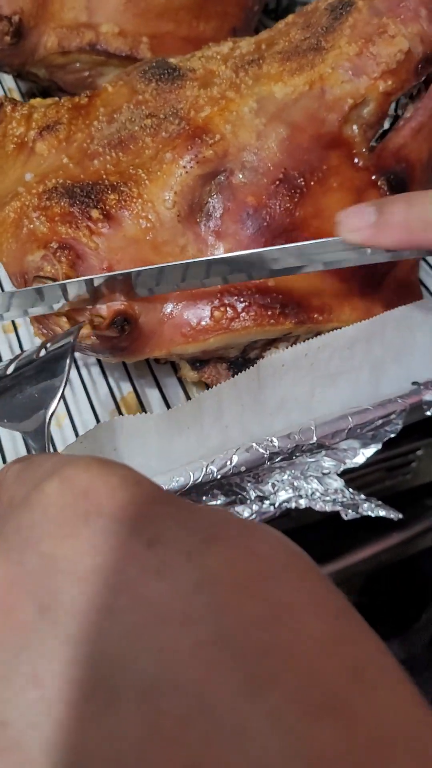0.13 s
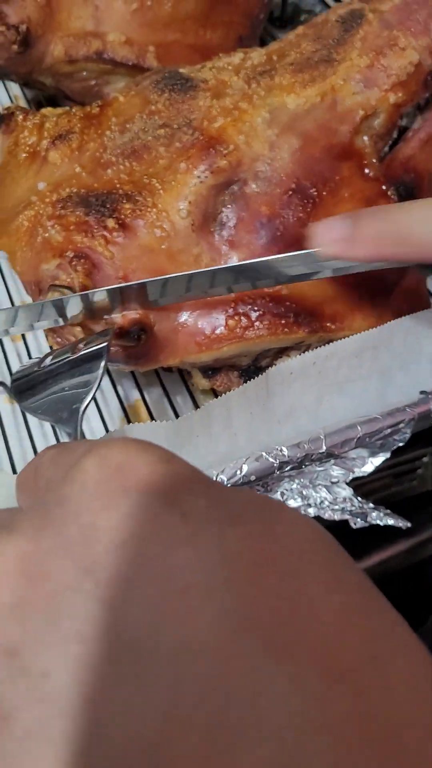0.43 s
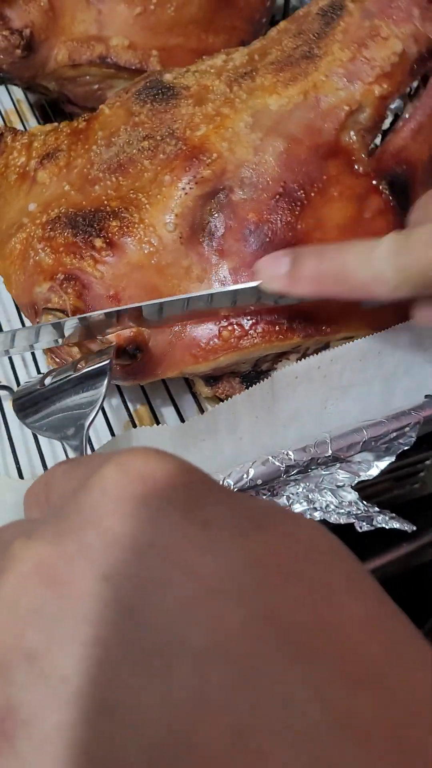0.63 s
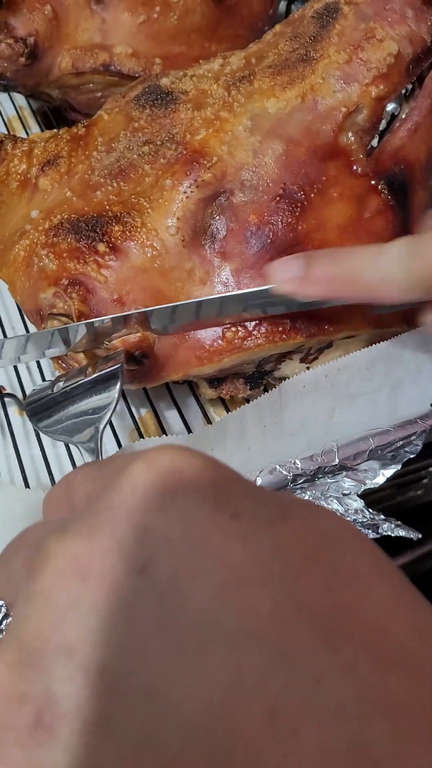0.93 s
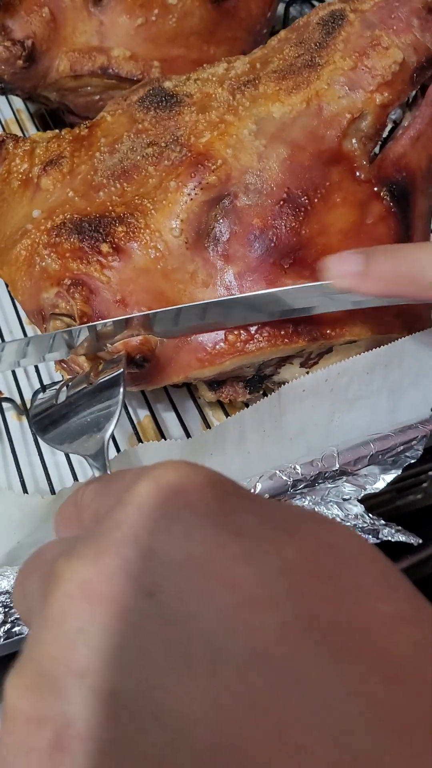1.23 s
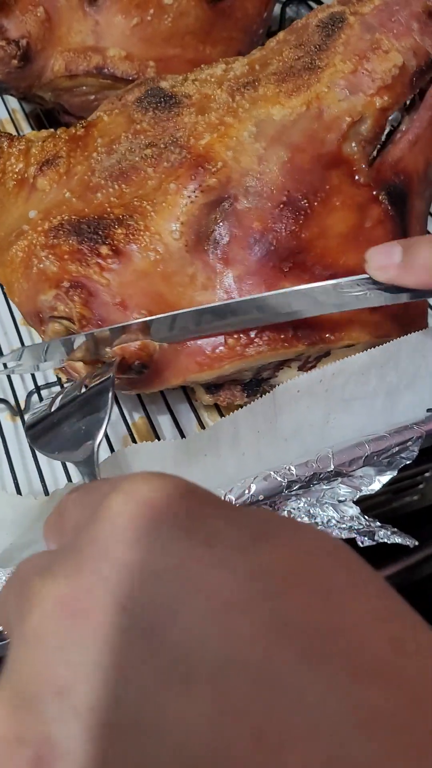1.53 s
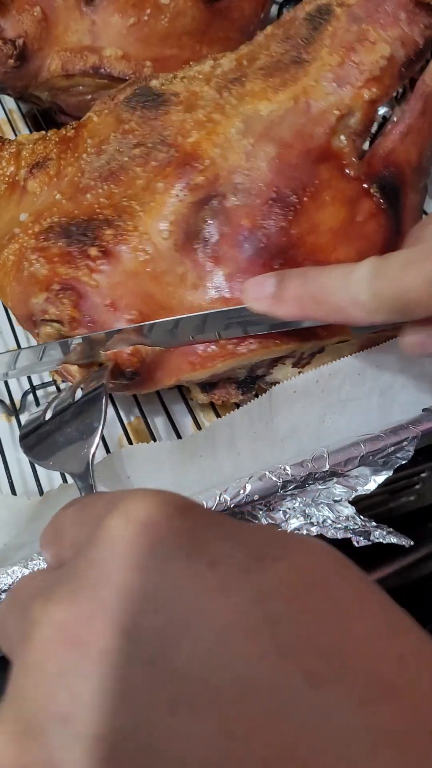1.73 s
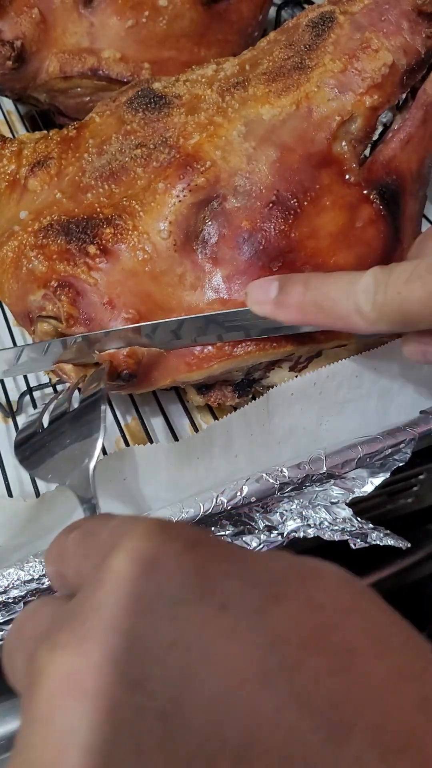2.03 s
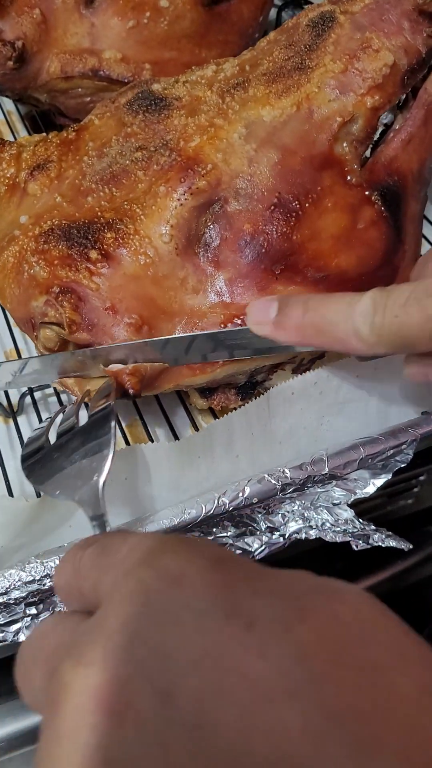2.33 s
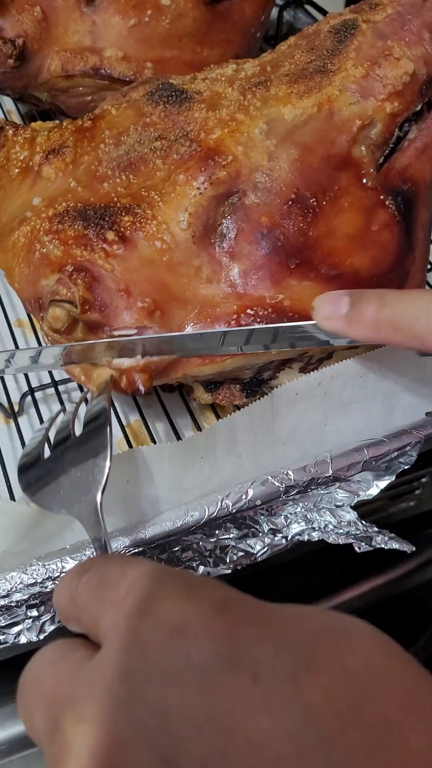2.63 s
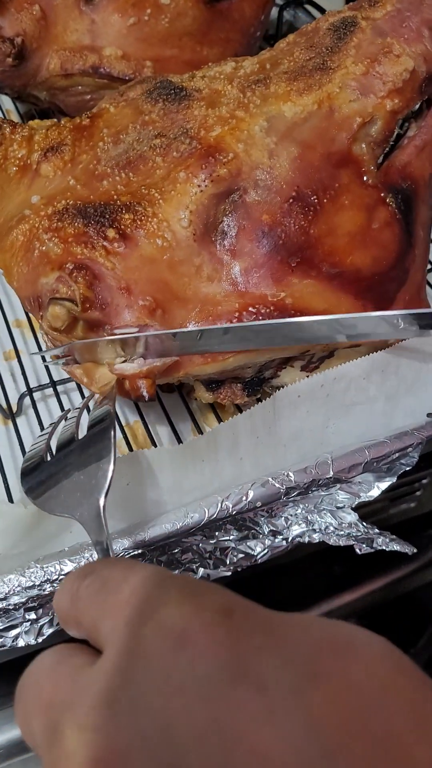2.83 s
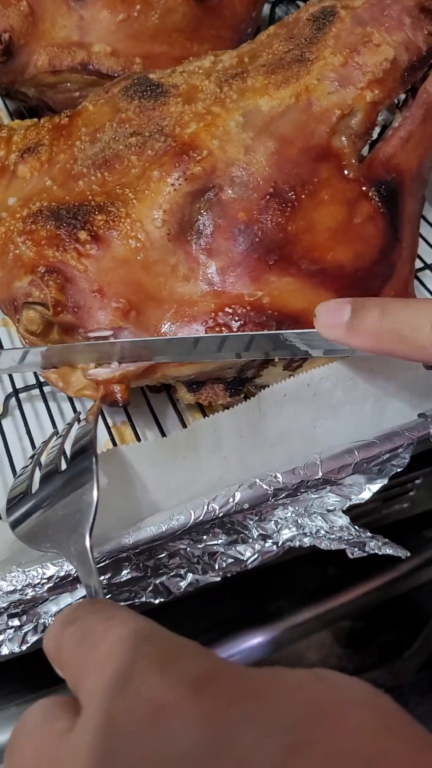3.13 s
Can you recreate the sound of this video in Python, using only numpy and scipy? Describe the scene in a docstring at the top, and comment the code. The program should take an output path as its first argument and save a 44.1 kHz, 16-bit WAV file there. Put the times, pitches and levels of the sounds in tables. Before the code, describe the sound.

Close up in a kitchen, rapid to-and-fro sawing crunches through brittle roast crust, with dry snaps and dull knocks, strongest mid-way and softer near the end, over faint room hum and handling rumble.

```python
"""Crackle and low thuds over a faint hum: a serrated knife saws to and fro through crisp roasted skin,
close to a phone in a kitchen. The teeth stick and slip: they judder the roast and its rack (thuds),
crush the crust (dense crackle), snap blisters (sharp cracks) and now and then catch hard (jolts).
Random clicks and noise set off these rings and rustles. The moving phone rumbles, an appliance hums
over the room noise, and the kitchen adds a short echo."""
import sys
import numpy as np
from scipy import signal
from scipy.fft import rfft, irfft
from scipy.io import wavfile
from scipy.ndimage import uniform_filter1d, map_coordinates

SR = 44100
rng = np.random.default_rng(int(sys.argv[2]) if len(sys.argv) > 2 else 0)


def waveform_to_disk(signal):
    """Save audio, clipped to [-1, 1], as 16-bit WAV at the path in sys.argv[1]."""
    frames = np.transpose(np.atleast_2d(signal))
    scaled = np.clip(frames, -1, 1) * 32767
    samples = np.round(scaled).astype(np.int16)
    wavfile.write(sys.argv[1], SR, samples)


N = 145530

# Loudness of the sawing, one list per knife stroke:
# time_s, judder_db (roast), knock_db (crust), crunch_db, fizz_db (fine crackle)
STROKE_LEVELS = [
    [(0.0, -53.5, -48, -59, -56), (0.046, -58.5, -91, -74, -59), (0.05, -71, -54.5, -73, -64),
     (0.062, -73, -69, -75, -66), (0.072, -51, -54.5, -82, -60), (0.08, -64, -79, -75, -59)],
    [(0.08, -69, -66, -78, -65), (0.106, -55, -55.5, -63.5, -65), (0.164, -50, -55, -66, -68),
     (0.174, -54, -68, -67, -65), (0.178, -58, -54, -68, -69), (0.21, -69, -78, -85, -77)],
    [(0.21, -74, -71, -95, -80), (0.228, -55, -56, -82, -65), (0.288, -49.5, -45, -49.5, -54),
     (0.324, -51.5, -48, -56, -54), (0.352, -44.5, -55, -56, -57), (0.41, -76, -67, -98, -74)],
    [(0.41, -78, -67, -68, -64), (0.432, -52, -48, -66, -60), (0.464, -39.5, -48, -56, -65),
     (0.494, -51, -43.5, -59, -63), (0.514, -51, -69, -72, -65), (0.56, -66, -55, -73, -69)],
    [(0.56, -66, -76, -76, -70), (0.59, -44.5, -43.5, -47.5, -51), (0.664, -42.5, -51.5, -49.5, -46),
     (0.688, -58, -55, -68, -65), (0.694, -40.5, -55, -68, -66), (0.74, -65, -78, -69, -76)],
    [(0.74, -52, -58, -61, -58), (0.764, -62, -66, -63, -69), (0.776, -35, -41, -57, -54),
     (0.788, -54.5, -55, -57, -55), (0.804, -39.5, -47.5, -53, -59), (0.91, -64.5, -66, -93, -78)],
    [(0.91, -53, -72, -70, -62), (0.94, -55, -46, -59, -57), (0.976, -41.5, -56, -55, -54),
     (0.996, -43.5, -58, -56, -59), (1.052, -65, -79, -79, -76), (1.08, -75, -72, -74, -81)],
    [(1.08, -65, -66, -66, -66), (1.092, -58, -64, -68, -69), (1.1, -54, -57, -61, -64),
     (1.15, -40.5, -41.5, -53, -59), (1.176, -46, -50.5, -55, -66), (1.24, -67, -67, -103, -83)],
    [(1.24, -65, -68, -70, -56), (1.244, -69, -71, -73, -74), (1.262, -38.5, -43.5, -55.5, -53),
     (1.33, -40.5, -44.5, -52, -50.5), (1.388, -53.5, -66, -70, -79), (1.42, -72, -55.5, -67, -61)],
    [(1.42, -58, -66, -63, -57), (1.45, -49.5, -53.5, -57.5, -59), (1.468, -41, -37.5, -49, -55),
     (1.504, -34.5, -38.5, -47, -59), (1.582, -55, -67, -75, -71), (1.6, -46, -46, -57, -57)],
    [(1.6, -69, -58, -70, -61), (1.614, -65, -53.5, -54.5, -55), (1.63, -26.5, -30, -48, -50),
     (1.644, -44, -45, -44, -48), (1.68, -37.5, -37, -54, -40.5), (1.77, -57.5, -70, -70, -69)],
    [(1.77, -54, -74, -62, -71), (1.794, -54, -48.5, -51, -55), (1.826, -42.5, -44, -42, -37.5),
     (1.87, -45.5, -50, -47, -45), (1.914, -63, -79, -75, -79), (1.92, -66, -60, -70, -74)],
    [(1.92, -68, -57, -67, -75), (1.93, -67, -57, -56, -61), (1.944, -51.5, -49.5, -47, -45),
     (1.968, -44, -43.5, -42.5, -43), (2.01, -40.5, -39.5, -44, -43), (2.1, -67, -68, -63, -60)],
    [(2.1, -56, -57, -63, -66), (2.128, -47, -48.5, -52, -46), (2.186, -51, -47.5, -51.5, -60),
     (2.246, -56, -66, -71, -59), (2.26, -62, -54, -71, -72)],
    [(2.26, -57, -53, -55.5, -59), (2.296, -46.5, -42, -50, -52), (2.344, -44, -51, -48, -48),
     (2.36, -48, -46, -64, -50), (2.39, -57.5, -63, -76, -65), (2.43, -57, -61.5, -65, -74)],
    [(2.43, -58, -59, -66, -75), (2.456, -44.5, -54, -57, -42), (2.49, -45, -46, -45, -37),
     (2.632, -62, -57.5, -63, -60), (2.65, -61, -60, -66, -58.5), (2.72, -64, -68, -70, -74)],
    [(2.72, -80, -60, -71, -64), (2.742, -57, -56, -65.5, -65), (2.78, -52, -54, -56.5, -66),
     (2.826, -55.5, -65.5, -72.5, -70), (2.894, -65, -66, -74, -72), (2.94, -68, -86, -99, -77)],
    [(2.94, -68, -78, -96.5, -80), (2.968, -61, -66, -81.5, -77), (2.976, -58, -60.5, -74, -64),
     (3.062, -56, -47.5, -53, -49), (3.118, -55.5, -53.5, -54.5, -59), (3.19, -62, -66, -94, -89)],
    [(3.19, -72, -78, -82, -75), (3.196, -71, -74, -65, -81), (3.206, -64, -51, -60, -54),
     (3.262, -48.5, -48.5, -46, -49), (3.28, -44, -48, -69, -71), (3.3, -47, -46, -51, -69)],
]
# Snapping blisters: start_s, level_db, and three gains within the snap:
# mid_db (900-2300 Hz), top_db (9500-19000 Hz), tail_db (splintering)
BLISTER_CRACKS = [(0.0074, -41, -9, 10, -19), (0.0278, -36.5, -10, -11, -19), (0.0488, -56, 1, 4, -8),
                  (0.0734, -48.5, 5, 4, -10), (0.223, -46.5, -5, -3, -5.5), (0.2326, -50.5, 1, 10, -16),
                  (0.257, -42, 1, -4, -5), (0.2815, -47, 2, 4, -5), (0.295, -40, -5, -1.5, -3.5),
                  (0.344, -38.5, -11, -4, -9.5), (0.4696, -61, -4, -9, -12), (0.5683, -53.5, 12, 14.5, -5),
                  (0.6014, -22, -14, 1, -13), (0.6155, -39, 5, 5, -15), (0.628, -36.5, -2, -3, -5.5),
                  (0.656, -25, -7, -0.5, -16.5), (0.67, -34, -18, 0, -9), (0.7535, -43.5, -6, 16.5, -16),
                  (0.7632, -41, -16, 2, -12), (0.8011, -40.5, 1, -19, -2.5), (0.828, -33.5, -0.5, -28, -14),
                  (0.9418, -42.5, -3, -12, -7), (0.962, -36, 0, 3, -20), (0.99, -42.5, -14, -8, -7),
                  (1.101, -46, -1, -9, -11), (1.1258, -39, 0, -9, -9), (1.1472, -35.5, -3, -12, -11.5),
                  (1.267, -42, -9, 9, -17), (1.275, -29.5, -19, -6, -17), (1.3032, -39, 0, -11, -4),
                  (1.3203, -43, -8, -7, -7), (1.418, -37, -10, -1.5, -14), (1.477, -43, -2, -12, -10),
                  (1.4895, -34, -1, -13, -13), (1.624, -34, -2, -3, -4), (1.645, -22.5, -15, 6, -10.5),
                  (1.6713, -24, -4, -26, -6.5), (1.6934, -30, -12, 9, -11.5), (1.7004, -22.5, -5, -12, -17),
                  (1.7978, -36, -21, -3, -2), (1.8159, -31, -17, -17, -5), (1.8589, -30.5, -5, -21, -1.5),
                  (1.9417, -32, 0, 0, -8.5), (1.9638, -33, 3, -4, -7.5), (1.9872, -24.5, -4, -22, -19),
                  (2.0148, -29.5, -17, -11, -9), (2.062, -36.5, 0, 9, -7), (2.1272, -35.5, -6, 6.5, -6.5),
                  (2.151, -33.5, -5, 10, -2), (2.1742, -33.5, 1, 17.5, -14), (2.1901, -26.5, -12, 0, -9),
                  (2.326, -32, -16, 1, -8.5), (2.3868, -40.5, -18, 4, -8), (2.4516, -37.5, -1, 8.5, -3.5),
                  (2.4663, -28.5, 5.5, -2, -10), (2.4783, -36, 1, -3, -5), (2.4817, -19, -8.5, -1, -2.5),
                  (2.4987, -21, -12, -2, -12), (2.52, -18.5, 0.5, -5, -7.5), (2.55, -22.5, -13, -1, -4.5),
                  (2.5991, -37, -5, 1, -9), (2.635, -47, 1, 1, -3), (2.7581, -58, 17.5, 0, -1),
                  (2.8062, -59, 13, 10, -7), (3.0024, -54, 1, 4, 1), (3.03, -41, 7, 2, -10),
                  (3.052, -27.5, 6, 3.5, -8), (3.0631, -40.5, 13.5, -32, 1.5), (3.207, -48, 16, -3, -12),
                  (3.226, -30, -3, 1, -9), (3.2626, -35, -8, -2, 0), (3.2768, -13.5, -13, -0.5, -3)]
# Teeth that catch hard and jolt the roast:
# start_s, level_db, pitch_hz, knock_db (crust balance, added to level_db)
HARD_CATCHES = [(0.105, -45, 283, -6), (0.133, -46, 316, -11), (0.24, -37, 990, -20),
                (0.261, -47, 274, -12), (0.286, -42.5, 231, -12), (0.304, -51, 229, 2),
                (0.327, -44, 920, -2), (0.35, -47, 250, 4), (0.361, -56, 296, -9), (0.443, -55, 230, 17),
                (0.467, -36.5, 330, 6), (0.488, -36, 286, 3.5), (0.589, -37, 268, -2),
                (0.609, -42, 270, 11), (0.636, -42, 264, -11), (0.653, -38, 640, 1), (0.694, -43.5, 298, 9),
                (0.773, -59, 255, 9), (0.786, -45, 340, -18), (0.803, -34.5, 326, 8),
                (0.824, -37.5, 332, 4), (0.934, -48, 328, 6), (0.942, -34, 320, 3), (0.965, -33, 324, 4.5),
                (0.988, -33, 328, 5.5), (1.105, -43.5, 254, -10), (1.155, -32, 250, -16),
                (1.179, -38, 249, 6.5), (1.258, -35, 257, 2.5), (1.276, -35, 318, -20),
                (1.285, -34.5, 370, -3), (1.305, -34, 230, -5), (1.328, -35.5, 246, -3),
                (1.467, -36, 258, 12), (1.48, -39, 260, -13), (1.498, -26, 269, -1), (1.523, -34.5, 223, 0),
                (1.541, -36.5, 240, -2), (1.627, -28, 333, -8), (1.656, -36.5, 206, 12),
                (1.669, -31.5, 957, 8.5), (1.691, -32, 316, 0), (1.733, -44.5, 240, -16),
                (1.832, -35, 260, -12), (1.858, -34.5, 270, -5), (1.877, -46, 230, -15),
                (1.952, -40, 890, -4), (1.971, -36.5, 330, 9), (1.986, -42, 181, -4),
                (2.008, -38.5, 328, -9), (2.131, -40, 328, 2), (2.16, -38, 185, -8), (2.187, -43, 328, -2),
                (2.299, -51, 335, 4), (2.322, -38.5, 274, 7), (2.336, -39, 263, -12), (2.347, -45, 314, -4),
                (2.459, -49, 316, 3), (2.482, -37.5, 663, 3), (2.544, -41, 1110, -3), (2.767, -43, 316, -3),
                (2.78, -39.5, 300, -4), (2.804, -40, 290, -2), (2.819, -58, 248, -11.5),
                (3.051, -46.5, 880, -1), (3.069, -47.5, 300, 8), (3.084, -43, 920, 4),
                (3.109, -43.5, 240, 13), (3.23, -45, 700, 8), (3.274, -33.5, 900, 7)]
# Loudness of the phone's handling rumble: time_s, level_db
RUMBLE_LEVELS = [(0.0, -65), (0.23, -73), (0.26, -64.5), (0.77, -63), (0.82, -48), (0.89, -61), (0.94, -54),
                 (0.99, -67), (1.2, -54), (1.38, -58.5), (1.41, -48), (1.55, -58), (1.82, -51), (1.94, -62),
                 (1.98, -51.5), (2.49, -61), (2.57, -55.5), (2.63, -69), (2.7, -61), (2.85, -71),
                 (3.04, -68), (3.18, -79), (3.25, -67), (3.3, -72)]
# What the roast and rack ring with: pitch_hz, width_hz, level_db
ROAST_RINGS = [(137, 19, -6), (163, 23, -4), (224.4, 48, 2), (283.3, 59, 1.5), (325.5, 29.8, 3),
               (470.3, 25, 0.5)]
# What the crust rings with: pitch_hz, width_hz, level_db
CRUST_RINGS = [(613, 277, -5.5), (694, 140, -1), (886, 131, -6), (1050, 280, -7), (1250, 494, -11)]
# Tone colour of the crunch: frequency_hz, gain_db
CRUNCH_COLOUR = [(900, -24), (1400, -10), (2000, 1.5), (3000, 3), (4200, 0.5), (5100, -2.5), (6000, -12),
                 (7500, -14.5), (9500, -62)]
# Tone colour of the fine fizz: frequency_hz, gain_db
FIZZ_COLOUR = [(5000, 8), (7000, 7.5), (8700, -4), (10500, 9.5), (13000, 9), (15000, 12.5), (16800, -16)]
# Tone colour of the room noise: frequency_hz, gain_db
ROOM_COLOUR = [(82, -31), (140, 8), (181, -23.5), (281, -11), (512, -34), (861, -35), (2290, -44),
               (2480, -50), (9250, -48), (11800, -30.5), (16500, -50)]
# Crumbs of each size ring at their own pitch: pitch_hz, width_hz, level is equal for all
CRUMB_SIZES = [(1500, 570), (2300, 1600), (3300, 420), (4400, 1450), (5500, 3100), (7200, 1900),
               (10000, 3200), (12500, 13000), (15800, 3700)]
# How much brighter the left port hears than the right: frequency_hz, difference_db
PORT_DIFFERENCE = [(1, 5.5), (450, -1.1), (750, 4.9), (1300, -5.5), (2400, 1.35), (4400, -5.5), (8000, 1),
                   (15000, 4.4), (30000, 3.5)]

ROOM_NOISE_DB, HUM_DB, HUM_HZ = -68.5, -68.5, 120
KITCHEN_T60_S, KITCHEN_DB = 0.22, -11  # T60: time to fade by 60 dB
LAG_S, SPREAD = 0.0002215, 0.95  # right port's delay; share of noise that differs between ports
TOP_HZ = 16200
# Sawing: rates per second, and how unequal the clicks are
SLIPS_PER_S, SLIP_SCATTER_DB = 550, 1.1
GRAINS_PER_S, GRAIN_SCATTER_DB, CRUMB_S = 3600, 0, 0.0018
CLUMPS_PER_S, CLUMP_DB = 130, 5.5
FIZZ_PAN_DB = 3
# Cracks
CRACK_RISE_S, CRACK_TICK_DB, CRACK_PAN_DB = 0.00078, 9, 4.5
CRACK_T60_S, TOP_T60_S, CRACK_TAIL_T60_S = 0.011, 0.003, 0.059
SPLINTER_SCATTER_DB = 3.5
BLISTER_LOW_HZ, BLISTER_HIGH_HZ, BLISTER_Q, BLISTER_DB = 1300, 8500, 7, 1  # Q: sharpness of ring
# Jolts
JOLT_RISE_S, JOLT_SHAPE, KNOCK_RISE_S = 0.0037, 0.97, 0.0013  # jolt rise is for 300 Hz


def amp(db):
    """Turn decibels into a plain multiplier."""
    return 10 ** (np.asarray(db) / 20)


def unit(x):
    """Scale to an average (RMS) level of 1."""
    return x / np.sqrt(np.mean(x ** 2))


def curve(rows, axis):
    """Turn one dB column into a gain that glides over time."""
    rows = np.array(rows, float)
    return amp(np.interp(np.arange(N) / SR, rows[:, 0], rows[:, axis]))


def colour(x, points):
    """Shape the tone by (Hz, dB) points; outside them the gain is -60 dB."""
    points = np.array(points, float)
    hz = np.arange(N // 2 + 1) * SR / N + 1  # the extra 1 avoids log(0)
    gain_db = np.interp(np.log(hz), np.log(points[:, 0]), points[:, 1], -60, -60)
    return irfft(rfft(x) * amp(gain_db), N)


def ring(x, modes):
    """Add up resonances (Hz, width Hz, dB) set off by x, with alternating signs."""
    total = 0
    for k, (hz, width, db) in enumerate(modes):
        b, a = signal.iirpeak(hz, hz / max(width, 5), fs=SR)
        total = total + (-1) ** k * amp(db) * signal.lfilter(b, a, x)
    return total


def clicks(per_s, scatter_db):
    """Clicks at random moments, up or down; more scatter makes some much bigger than the rest."""
    chance, sign, size = rng.random((3, N))
    size_db = np.minimum(-scatter_db * np.log(size + 1e-9), 22)
    return (chance < per_s / SR) * np.sign(sign - .5) * amp(size_db)


def ports(x, pan_db):
    """Two microphone ports: the right one hears the sound later and weaker."""
    late = map_coordinates(x[1], [np.arange(x.shape[1]) - LAG_S * SR], order=3)
    return np.array([x[0], late]) * amp(np.array([[pan_db], [-pan_db]]) / 2)


def background():
    """Coloured room noise, a tone for the appliance hum, and low noise as the phone is handled."""
    mid, side, low, low_side = rng.standard_normal((4, N))
    left_right = np.array([[1], [-1]])  # opposite signs make the noise wide
    side = signal.lfilter(*signal.butter(1, 500, "high", fs=SR), side)
    air = amp(ROOM_NOISE_DB) * unit(colour(mid + 2.1 * left_right * side, ROOM_COLOUR))
    tone = np.sin(2 * np.pi * HUM_HZ * np.arange(N) / SR)
    waver = unit(ring(mid, [(HUM_HZ, 12, 0)]))  # narrow noise around the hum
    hum = amp(HUM_DB) * unit(tone + 0.16 * waver)
    band = signal.butter(2, (38, 95), "band", fs=SR, output="sos")
    shaking = unit(signal.sosfilt(band, low + 0.27 * left_right * low_side))
    rumble = curve(RUMBLE_LEVELS, axis=1) * shaking
    return air + hum + rumble


def kitchen(x):
    """A short diffuse echo: the sound is smeared by fading noise, different on each side."""
    t = np.arange(SR // 2) / SR
    fade = np.exp(-np.log(1000) * t / KITCHEN_T60_S)
    echo = rng.standard_normal((2, len(t))) * fade * (t > .004)  # starts after 4 ms
    echo = signal.lfilter(*signal.butter(1, 400, "high", fs=SR), echo)
    echo = signal.lfilter([1], [1, -.5], echo)  # soften the treble
    echo = echo / np.sqrt(np.sum(echo ** 2, 1, keepdims=True))
    return signal.fftconvolve(x, echo, axes=1)[:, :N]


def jolts():
    """At each hard catch the roast swings briefly and a noise burst makes the crust ring."""
    n = 4000
    t = np.arange(n) / SR
    swing, taps = np.zeros(N + n), np.zeros((2, N + n))
    noises = rng.standard_normal((len(HARD_CATCHES), 3, n))
    for (start_s, db, hz, knock_db), noise in zip(HARD_CATCHES, noises):
        i = int(start_s * SR)
        rise = JOLT_RISE_S * (300 / hz) ** 0.39  # quicker swings build and die sooner
        swell = (t / rise * np.exp(1 - t / rise)) ** JOLT_SHAPE
        swing[i:i + n] += amp(db) * np.sin(2 * np.pi * hz * t) * swell
        burst = t / KNOCK_RISE_S * np.exp(-t / KNOCK_RISE_S)
        taps[:, i:i + n] += amp(db + knock_db) * (noise[0] + 0.99 * noise[1:]) * burst
    knocks = amp(21.5) * ring(taps[:, :N], CRUST_RINGS)
    return ports(np.tile(swing[:N], (2, 1)), 0.42) + ports(knocks, 1.6)


def cracks():
    """Each snap tears for a moment, ticks, rings at the blister's own pitches and splinters unevenly."""
    n = 4000
    out = np.zeros((2, N + n))
    t = np.arange(n) / SR
    after = np.maximum(t - CRACK_RISE_S, 0)
    head, top, tail = (np.exp(-np.log(1000) * after / t60)
                       for t60 in (CRACK_T60_S, TOP_T60_S, CRACK_TAIL_T60_S))
    rise = np.minimum(t / CRACK_RISE_S, 1)
    tick = int(CRACK_RISE_S * SR)  # sample where the skin gives way
    bands = [signal.butter(2, edges, "band", fs=SR, output="sos")
             for edges in ((900, 2300), (2000, 8000), (9500, 19000))]
    noises = rng.standard_normal((len(BLISTER_CRACKS), 4, n))
    places = rng.random((len(BLISTER_CRACKS), 4))
    for (start_s, db, mid_db, top_db, tail_db), noise, place in zip(BLISTER_CRACKS, noises, places):
        # the tail takes a new random level every 80 samples
        splinters = amp(tail_db + SPLINTER_SCATTER_DB * np.repeat(noise[3, :50], 80)) * tail
        hiss = noise[0] + SPREAD * noise[1:3]
        low = hiss * (head + splinters) * rise / 2
        high = hiss * (top + splinters) * rise / 2
        low[:, tick] = 0.17
        high[:, tick] = amp(CRACK_TICK_DB)
        # four pitches, one at random in each quarter of the range
        steps = (np.arange(len(place)) + place) / len(place)
        pitches = BLISTER_LOW_HZ * (BLISTER_HIGH_HZ / BLISTER_LOW_HZ) ** steps
        low = low + ring(low, [(hz, hz / BLISTER_Q, BLISTER_DB) for hz in pitches])
        gains = (amp(mid_db), -1, amp(top_db))
        snap = sum(gain * signal.sosfilt(band, x)
                   for gain, band, x in zip(gains, bands, (low, low, high)))
        i = int(start_s * SR)
        out[:, i:i + n] += ports(amp(db) * snap, CRACK_PAN_DB)
    return out[:, :N]


def crumble(ticks, spread, length_s):
    """Each tick trails a short fading rustle that differs at the two ports."""
    trail = signal.lfilter([1], [1, -np.exp(-1 / (length_s * SR))], np.abs(ticks))
    rustle = unit(trail * rng.standard_normal((2, N)))
    return unit(unit(ticks) + spread * rustle)


def crumbs():
    """Breaking crumbs: broad ticks, plus clumps of pitched grains for every crumb size."""
    out = crumble(clicks(GRAINS_PER_S, GRAIN_SCATTER_DB), SPREAD, CRUMB_S) * 0.84
    k = int(SR / CLUMPS_PER_S)
    for hz, width in CRUMB_SIZES:
        levels = np.repeat(rng.standard_normal(N // 50), k)[:N]
        clump = amp(CLUMP_DB * uniform_filter1d(levels, k))  # smoothed ups and downs
        grains = crumble(clicks(550, 4.9), 1.0, 0.0051)
        out = out + clump * ring(grains, [(hz, width, 0)])
    return out


def sawing():
    """Teeth that stick and slip shake the roast and crust; crumbs break in dense grains."""
    rows = sum((list(stroke) for stroke in STROKE_LEVELS), [])
    slips = clicks(SLIPS_PER_S, SLIP_SCATTER_DB)
    roast = ring(crumble(slips, 0.24, 0.01), ROAST_RINGS)
    judder = unit(ring(roast, [(318, 2400, 0)]))  # broad emphasis around 318 Hz
    crust_hits = slips + 1.13 * clicks(600, 3.26)
    knock = unit(ring(crumble(crust_hits, 0.94, 0.0024), CRUST_RINGS))
    grains = crumbs()
    crunch = unit(colour(grains, CRUNCH_COLOUR))
    fizz = unit(colour(grains, FIZZ_COLOUR))
    return (ports(curve(rows, axis=1) * judder, 0.12)
            + ports(curve(rows, axis=2) * knock, 2.04)
            + ports(curve(rows, axis=3) * crunch, 9.3)
            + ports(curve(rows, axis=4) * fizz, FIZZ_PAN_DB))


def scene():
    """The knife sounds, their kitchen echo and the background."""
    knife = sawing() + cracks() + jolts()
    return knife + amp(KITCHEN_DB) * kitchen(knife) + background()


def record(dry):
    """The two ports are coloured oppositely; the phone cuts the top."""
    heard = [colour(x, np.array(PORT_DIFFERENCE) * [1, side / 2]) for x, side in zip(dry, (1, -1))]
    return signal.sosfilt(signal.ellip(10, .2, 70, TOP_HZ, fs=SR, output="sos"), heard)


dry = scene()
out = record(dry)
waveform_to_disk(out)
```